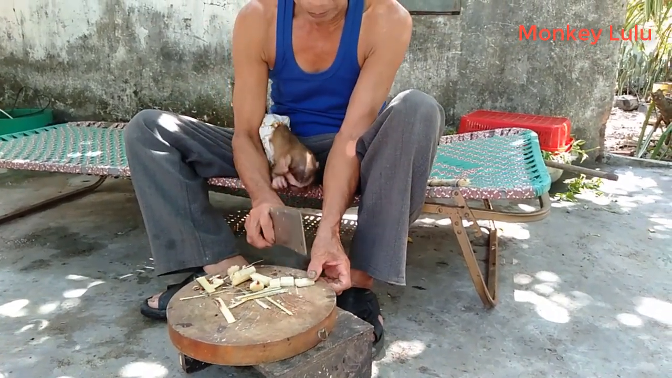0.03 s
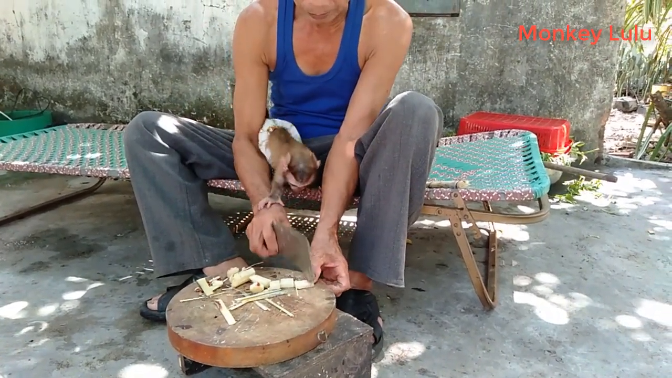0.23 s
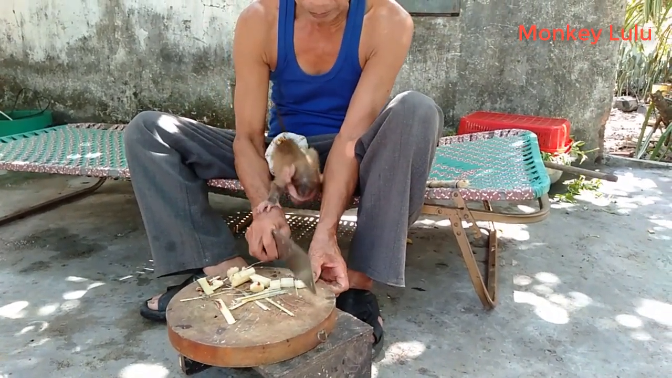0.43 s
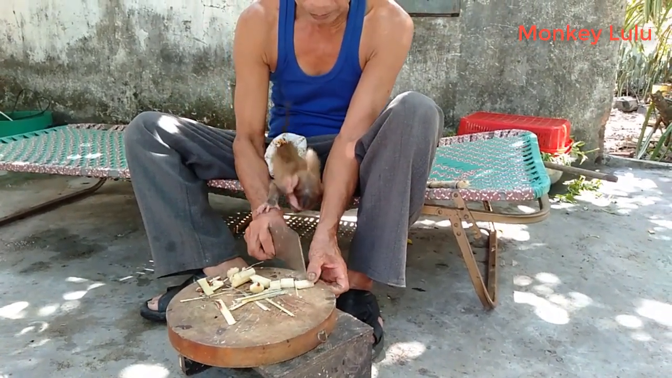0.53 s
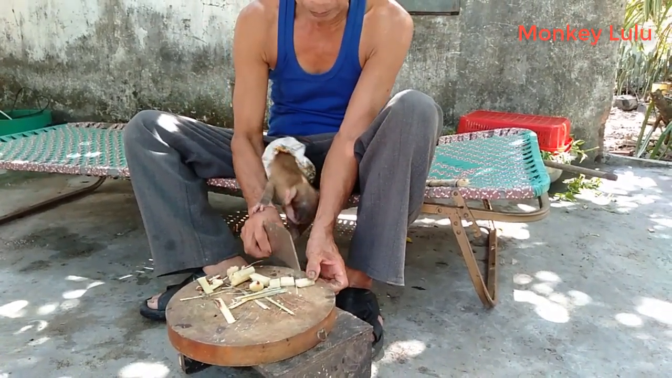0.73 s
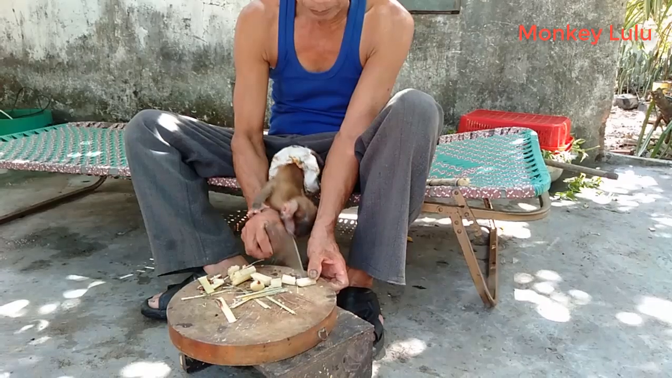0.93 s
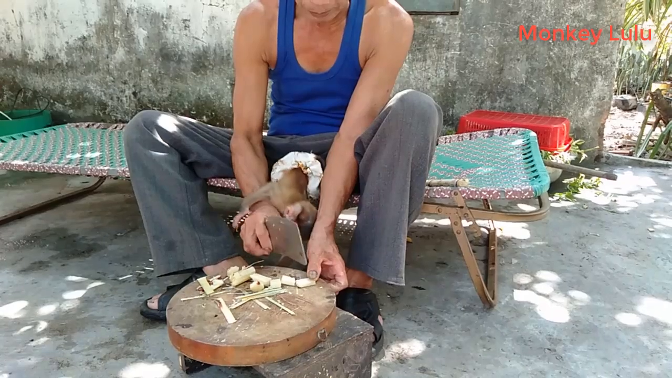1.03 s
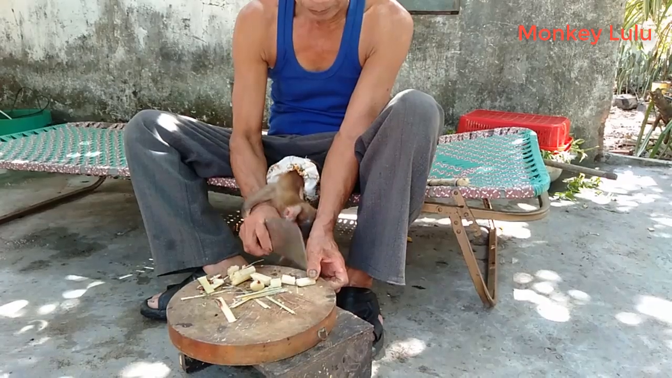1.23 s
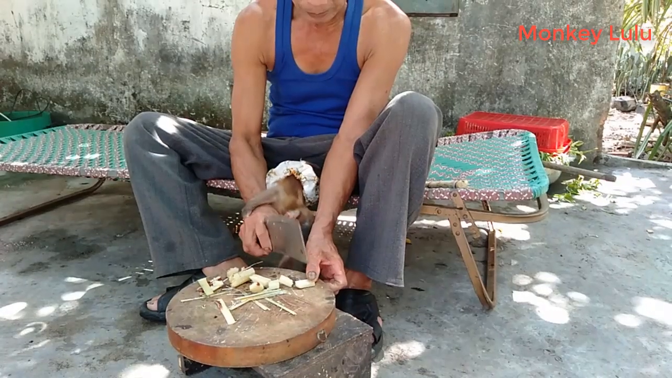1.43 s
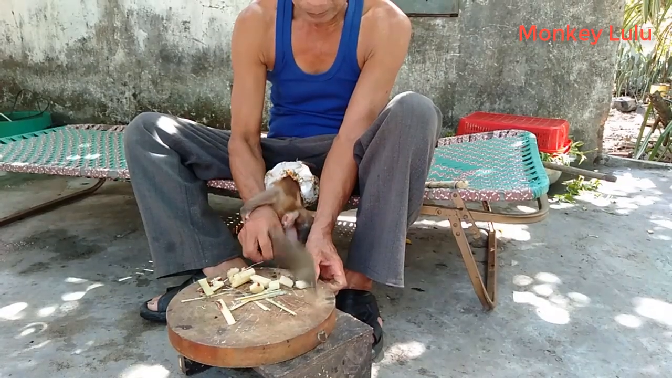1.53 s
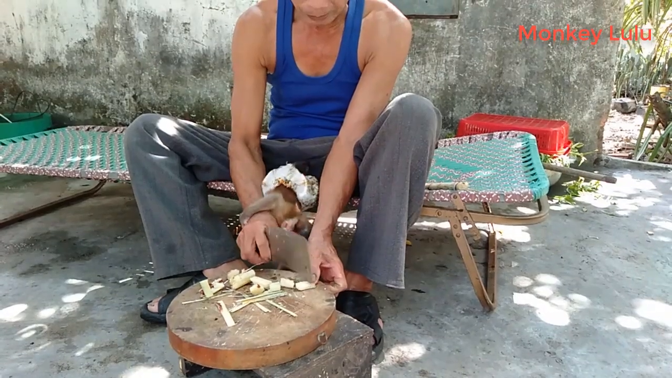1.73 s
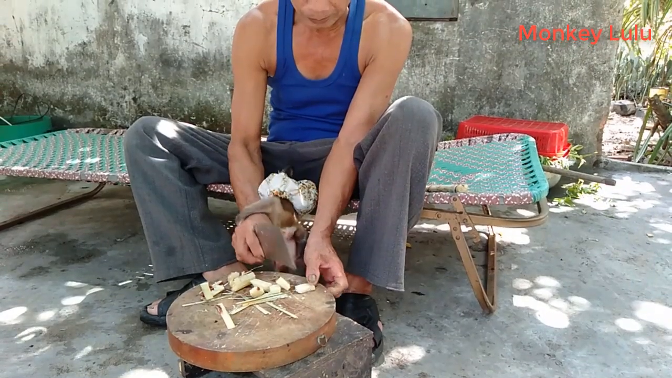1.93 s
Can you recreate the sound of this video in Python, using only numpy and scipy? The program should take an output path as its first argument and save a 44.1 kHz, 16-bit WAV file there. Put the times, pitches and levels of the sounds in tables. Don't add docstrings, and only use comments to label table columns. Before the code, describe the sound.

Hard woody chops on a block, light ticks and tumbling cane bits between, over faint insect buzz

```python
import sys
import numpy as np
from scipy import signal
from scipy.fft import rfft, irfft, next_fast_len
from scipy.io import wavfile
from scipy.ndimage import map_coordinates

SR = 44100
rng = np.random.default_rng(int(sys.argv[2]) if len(sys.argv) > 2 else 0)


def bounce(signal):
    frames = np.transpose(np.atleast_2d(signal))
    limited = np.clip(frames, -1, 1)
    pcm = np.round(limited * 32767).astype(np.int16)
    wavfile.write(sys.argv[1], SR, pcm)


def voltage_ratio(level):
    return 10 ** (np.asarray(level, float) / 20)


N = 85995

# frequency in Hz, width in Hz, level in dB.
MIDDLE_MODES = [(200, 14, -20.5), (470.5, 51, 13), (950, 10, 5.5), (1170, 5, -3.5), (1423, 80, 4),
                (1652, 7.8, -7.5), (2013, 29, 0), (2603, 210, -4.5), (2900, 41, -17.5), (3270, 98, -8.5),
                (3765, 110, -13), (4350, 200, -9.5), (4924, 100, -15), (759, 9.8, 1)]
RIM_MODES = [(200, 35, -18), (457, 32, 10), (930, 11.4, 4.5), (1244, 20, -12), (1308, 22, -10.5),
             (1592, 14, -4.5), (2435, 57, -11), (2930, 23, -18), (3570, 52, -19.5), (4800, 46, -21),
             (865, 24, -12)]
LATE_MODES = [(186, 12, -16), (477, 51, 10.5), (948, 46, 6), (1176, 10, -5.5), (1378, 71, 1.5),
              (1620, 32, -3.5), (2010, 17, -2), (2340, 127, -2.5), (2900, 30, -12), (3310, 110, -12),
              (3780, 110, -13), (4270, 190, -10), (4760, 100, -12.5), (758, 14, -3)]
TOUCH_MODES = [(130, 59, -18), (437, 8.1, 1.5), (940, 72, -1)]
# start in seconds, level in dB, free ringing in seconds, brightness in dB per octave,
# fibre crack in dB.
MIDDLE_CHOPS = [
    (0.2266, -30, 0.0066, 2, -15),
    (0.462, -30, 0.0064, 2.5, -14.5),
]
RIM_CHOPS = [
    (0.9236, -35, 0.00528, .1, -22.5),
]
LATE_CHOPS = [
    (1.6532, -31, 0.0067, 0.53, -19),
]
# frequency in Hz, level in dB.
FIBRE = [(300, -70.5), (1500, 13.5), (4000, 10), (8000, 13.5), (12000, -47), (15500, -1)]
SPLINTERS = [(1500, -25), (2400, 9.5), (3300, -8), (4500, -7.5), (5600, -12), (7000, -26)]
RATTLE = [(120, -10), (200, -7), (400, -1.5), (800, -2.5), (1600, 4), (3000, -6.5), (5500, -14.5),
          (9000, -38)]
THUMP = [(30, -22), (60, -1), (100, 6.5), (160, 14), (260, -33.5)]
FIZZ = [(2000, -42.5), (4500, -6), (8000, 3.5), (11000, -12), (13500, -8.5), (15400, 4), (16000, 1.5)]
# start in seconds, level in dB, t60 in seconds.
FIZZES = [(0.2287, -65, 0.28), (.4615, -73, 0.17), (0.6826, -53, 0.17), (.919, -59, 0.15),
          (1.385, -63.5, 0.25), (1.65, -58, 0.24), (1.888, -63.5, 0.17), (1.11, -75, 0.47)]
# frequency in Hz, width in Hz, level in dB.
EDGE_MODES = [(5200, 110, -3), (5820, 51, -3), (7040, 60, 1), (9100, 150, -18)]
GRAZE_MODES = [(2127, 93, 5), (2650, 120, -16), (4770, 110, -11), (6330, 230, 14), (7630, 190, 16),
               (11300, 300, -2), (15960, 240, -5)]
# start in seconds, level in dB, brightness in dB per octave,
# free ringing in seconds.
EDGE_RINGS = [(0.2277, -56, 3.5, 0.0056), (0.464, -66, 0, .006), (0.923, -68.5, 5.5, .005),
              (1.6535, -55.5, 1.5, .008)]
# start in seconds, level in dB, brightness in dB per octave, fibre crack in dB.
GRAZES = [(0.6822, -51.5, -6.5, -16), (0.6842, -54, -0.5, -4.5), (1.3848, -68, 0, 6),
          (1.3872, -69.5, 1.5, -3), (1.8925, -64, -1, -7)]
# frequency in Hz, width in Hz, level in dB.
SHORT_PIECE = [(1050, 270, 0.5), (1360, 70, -5.5), (1718, 90, 4), (1990, 180, -5), (2604, 134, 0),
               (2950, 95, -5.5), (3450, 170, -1.5), (4470, 180, -2.5), (5060, 190, -5)]
LONG_PIECE = [(1260, 390, 6), (1720, 280, -0.5), (1970, 150, -5), (2490, 180, -2.5), (3050, 230, -3),
              (3470, 280, -3.5), (4400, 250, -7), (5770, 300, -12)]
DULL_WOOD = [(105.7, 57, -4.5), (185, 97, 0.5), (426, 61, -2.5), (619, 190, -20), (950, 340, -8.5),
             (1350, 830, -5.5), (2080, 2300, -10.5), (3630, 3300, -35)]
# start in seconds, level in dB, brightness in dB per octave.
SHORT_TICKS = [(1.0625, -53.5, 0), (1.2682, -46, -2.3), (1.8677, -63, 2.5), (1.87, -70, 6.5),
               (1.8734, -68.5, -3)]
LONG_TICKS = [(1.1108, -41.5, -3), (1.1126, -53, 4)]
TOUCHES = [(0.6836, -56, -1), (0.7046, -50.5, 4)]
# start in seconds, length in seconds, level in dB, softness in Hz,
# the piece's note in Hz.
TUMBLES = [(0.686, 0.053, -68, 250, 150), (0.793, 0.036, -68, 1060, 755), (0.92, 0.0036, -50, 1470, 1060),
           (1.3862, 0.005, -60, 3500, 1100), (1.388, 0.031, -58, 1260, 216), (1.42, 0.012, -59, 346, 415),
           (1.888, 0.0059, -56.5, 594, 600), (1.912, 0.011, -55, 1090, 590)]
# start in seconds,
# peak level in dB, note in Hz, width of the note over its pitch.
LANDINGS = [(0.793, -61, 890, 0.29), (0.7965, -52, 710, 0.24), (0.8032, -53, 780, 0.17),
            (0.806, -56, 796, 0.17), (0.8075, -59, 844, 0.27), (0.8318, -66, 845, 0.27),
            (1.3937, -50.5, 1110, 0.58), (1.9058, -54, 1500, 0.22), (1.3888, -46, 900, 0.77),
            (1.3917, -46.5, 242, 0.78), (1.3945, -48, 950, 0.8), (1.399, -57, 420, 0.21),
            (1.4021, -45, 226, 0.95), (1.4081, -60, 330, 0.38), (1.4157, -58, 298, .6),
            (1.4195, -48, 910, 0.16), (1.421, -53, 423, 0.22), (1.4251, -51.5, 416, 0.29),
            (1.6709, -40, 517, 0.7), (1.893, -54.5, 810, .5), (1.8959, -49, 183, 0.49),
            (1.905, -44, 864, 0.11), (1.9072, -48.5, 460, 0.29), (1.9118, -48, 335, 1),
            (1.919, -49, 810, 0.26), (1.9237, -51.5, 460, 0.49), (1.928, -65, 504, .4)]
# middle in seconds, half length in seconds, level in dB, pitch in Hz.
SLIDES = [(.84, 0.031, -83.5, 3040), (1.22, 0.028, -76, 2900)]
# body resonance in Hz, width in Hz, clicks per second, level in dB.
CICADAS = [(7164, 920, 215, -68.5), (6940, 820, 100, -68), (7615, 310, 190, -76), (5976, 1300, 310, -73.5),
           (8100, 280, 2100, -90.5)]
# time in seconds, pitch in Hz, level in dB.
BIRD = [(0.098, 2880, -98), (.11, 2830, -83), (.135, 2720, -87), (.17, 2720, -79), (.21, 2700, -85),
        (0.24, 2710, -100)]
# frequency in Hz, level in dB per Hz.
TRAFFIC = [(15, -33), (30, -9.5), (84, -2), (180, -18.5), (400, -25), (800, -17), (1600, -27), (4500, -34)]
LEAVES = [(3000, 7), (5000, -8), (9000, -3.5), (12000, 1), (14900, 0), (15400, -31.5)]
# frequency in Hz, t60 in seconds.
YARD = [(150, 0.24), (400, 0.16), (1000, 0.16), (2800, 0.24), (7000, 0.035), (15000, 0.099)]


def unit(x):
    return x / np.sqrt(np.mean(x ** 2) + 1e-20)


def along(points, hz):
    f, v = np.transpose(points)
    return np.interp(np.log(hz + 1), np.log(f + 1), v)


def wobble(rate):
    knots = rng.standard_normal(int(N * rate / SR) + 4)
    return map_coordinates(knots, [np.arange(N) * rate / SR])


def filtered(x, response):
    m = next_fast_len(len(x) + SR // 4)
    return irfft(rfft(x, m) * response(np.fft.rfftfreq(m, 1 / SR)), m)[:len(x)]


def highpass(corner_hz):
    return lambda f: 1j * f / (corner_hz + 1j * f)


def peaks(modes):
    def response(f):
        total = 0
        for k, (hz, width, db) in enumerate(modes):
            total = total + (-1) ** k * voltage_ratio(db) * 1j * f * width / (hz * hz - f * f + 1j * f * width)
        return total
    return response


def hiss(spectrum, size=N):
    noise = rng.standard_normal(size)
    return unit(filtered(noise, lambda f: voltage_ratio(along(spectrum, f)) * (f > 10)))


def burst(spectrum, rise_s, t60, grain_db):
    t = np.arange(SR // 3) / SR
    level = voltage_ratio(grain_db * wobble(400)[:len(t)] - 60 * t / t60)
    return hiss(spectrum, size=len(t)) * level * (1 - np.exp(-t / rise_s))


def ring(modes, tilt_db=0, free_s=1, swell_s=0):
    t = np.arange(SR // 8) / SR
    hz, width, db = np.transpose(modes)[:, :, None]
    spread_db, rise_s, choke_s = 0.8, 0.00049, 0.006
    level = voltage_ratio(db + tilt_db * np.log2(hz / 1000) + spread_db * rng.standard_normal(hz.shape))
    side = (-1) ** np.arange(len(modes))[:, None]
    rise = 1 - np.exp(-t / (rise_s + swell_s * (hz / 3000) ** 2))
    choke = voltage_ratio(-60 * np.maximum(t - free_s, 0) / (choke_s * (hz / 500) ** 0.5))
    decay = np.exp(-np.pi * width * t)
    return np.sum(side * level * rise * choke * decay * np.cos(2 * np.pi * hz * t), axis=0)


def add(out, s, x, away=None):
    yard_db, delay_s, far_db, far_t60 = -10.5, 0.0048, -23, 0.2
    hz, t, z = signal.stft(rng.standard_normal(SR // 2), SR, nperseg=256)
    fade = voltage_ratio(-60 * t / along(YARD, hz)[:, None]) + voltage_ratio(far_db - 60 * t / far_t60)
    tail = signal.istft(z * fade, SR, nperseg=256)[1]
    walls = np.pad(tail / np.linalg.norm(tail), (round(delay_s * SR), 0))
    wet = voltage_ratio(yard_db) * signal.fftconvolve(x if away is None else away, walls)
    wet = wet + np.pad(x, (0, len(wet) - len(x)))
    part = out[round(s * SR):][:len(wet)]
    part += wet[:len(part)]


def cicadas():
    out = np.zeros(N)
    jitter, click_db, smear, octave_db, sway_db = 0.12, 3, 0.69, -27.5, 0.7
    for hz, width, rate, db in CICADAS:
        gaps, sizes = rng.standard_normal((2, 700))
        at = (np.cumsum(1 + jitter * gaps) / rate * SR).astype(int)
        clicks = np.bincount(at[at < N], voltage_ratio(click_db * sizes[at < N]), N)
        drive = (1 - smear) * unit(clicks) + smear * rng.standard_normal(N)
        body = peaks([(hz, width, 0)])
        octave = peaks([(2.1 * hz, width, octave_db / 2)])
        buzz = filtered(drive, lambda f: body(f) ** 2 + octave(f) ** 2 * (f < 15250))
        out += voltage_ratio(db + sway_db * wobble(3.8) + 0.5 * wobble(25)) * unit(buzz)
    return out


def air():
    traffic = voltage_ratio(-72.5 + 0.55 * wobble(15)) * hiss(TRAFFIC + [(9000, -97)])
    leaves = voltage_ratio(-84.5 + 1.8 * wobble(6.0)) * hiss([(1500, -25.5)] + LEAVES)
    return traffic + leaves


def bird():
    s, hz, db = np.transpose(BIRD)
    t = np.arange(N) / SR
    level = np.interp(t, s, db, left=-140, right=-140) + 3 * wobble(70)
    pitch = np.interp(t, s, hz) + 22 * wobble(140)
    return voltage_ratio(level) * np.sin(2 * np.pi * np.cumsum(pitch) / SR)


def crack():
    t = np.arange(SR // 8) / SR
    return hiss(FIBRE, size=len(t)) * voltage_ratio(-60 * t / 0.0098 / 3)


def chops():
    out = np.zeros(N)
    lead_s = 0.0013
    wall_s, wall_db = 0.0165, -19
    away_s, away_db = 0.0033, 7
    blows = zip((MIDDLE_MODES, RIM_MODES, LATE_MODES), (MIDDLE_CHOPS, RIM_CHOPS, LATE_CHOPS),
                (-12, -23, -20),
                (2.2, -1.1, 0.5))
    for modes, rows, tear_db, loose_db in blows:
        for s, db, free_s, tilt_db, crack_db in rows:
            body = ring(modes, tilt_db, free_s, swell_s=0.00056)
            knock = np.roll(body, round(lead_s * SR)) + voltage_ratio(crack_db) * crack()
            echo = voltage_ratio(wall_db) * np.roll(knock, round(wall_s * SR))
            away = voltage_ratio(db + away_db) * body * np.exp(-np.arange(len(body)) / SR / away_s)
            add(out, s - lead_s, voltage_ratio(db) * (knock + echo), filtered(away, highpass(414)))
            rattle = burst(RATTLE, rise_s=0.011, t60=0.26, grain_db=-1.5)
            add(out, s, voltage_ratio(db - 19.5 + loose_db) * rattle)
            add(out, s, voltage_ratio(db + tear_db) * burst(SPLINTERS, rise_s=0.0022, t60=0.05, grain_db=4.5))
    return out


def thumps():
    out = np.zeros(N)
    for rows in (MIDDLE_CHOPS, RIM_CHOPS, LATE_CHOPS):
        for s, db, *_ in rows:
            add(out, s, voltage_ratio(db - 24) * burst(THUMP, rise_s=0.0013, t60=0.2, grain_db=-4.0))
    return out


def edge_rings():
    out = np.zeros(N)
    for s, db, tilt_db, free_s in EDGE_RINGS:
        add(out, s, voltage_ratio(db) * ring(EDGE_MODES, tilt_db, free_s))
    return out


def fizzes():
    out = np.zeros(N)
    for s, db, t60 in FIZZES:
        add(out, s, voltage_ratio(db) * burst(FIZZ, rise_s=0.0012, t60=t60, grain_db=-2.0))
    return out


def grazes():
    out = np.zeros(N)
    for s, db, tilt_db, crack_db in GRAZES:
        add(out, s, voltage_ratio(db) * (ring(GRAZE_MODES, tilt_db) + voltage_ratio(crack_db) * crack()))
    return out


def cleaver():
    above = chops() + edge_rings() + fizzes() + grazes()
    return thumps() + filtered(above, lambda f: highpass(150)(f) ** 2)


def touches():
    out = np.zeros(N)
    for s, db, tilt_db in TOUCHES:
        touch = voltage_ratio(db) * ring(TOUCH_MODES, tilt_db, free_s=0.0109)
        add(out, s, touch, touch * np.exp(-np.arange(len(touch)) / SR / 0.0082))
    return out


def tumbles():
    out = np.zeros(N)
    bumps_per_s, bump_db = 900, -2.5
    for s, length, db, soft_hz, hz in TUMBLES:
        when, size, side = rng.random((3, 80))
        at = np.cumsum(-np.log(when)) / bumps_per_s
        at -= at[0]
        inside = at < length
        strength = voltage_ratio(bump_db * 2 * size) * np.sign(side - 0.5)
        bumps = np.zeros(SR // 8)
        np.add.at(bumps, (at[inside] * SR).astype(int), strength[inside])
        note = peaks([(hz, 0.61 * hz, -7.5)])
        thud = filtered(bumps, lambda f: (peaks(DULL_WOOD)(f) + note(f)) / (1 + 1j * f / soft_hz) ** 2)
        add(out, s, voltage_ratio(db) * thud / np.sqrt(np.sum(thud ** 2) / (length * SR)))
    return out


def landings():
    out = np.zeros(N)
    push = np.eye(1, SR // 8)[0]
    body_db, softness = -6, 1.6
    for s, db, hz, width in LANDINGS:
        note = peaks([(hz, width * hz, 0)])
        soft = lambda f: 1 / (1 + 1j * f / (softness * hz)) ** 2
        thud = filtered(push, lambda f: (note(f) + voltage_ratio(body_db) * peaks(DULL_WOOD)(f)) * soft(f))
        add(out, s, voltage_ratio(db) * thud / np.abs(thud).max())
    return out


def slides():
    out, t = np.zeros(N), np.arange(N) / SR
    for s, half, db, hz in SLIDES:
        grain = rng.standard_normal(N) * voltage_ratio(2.1 * wobble(150))
        rub = filtered(grain, lambda f: peaks([(hz, 0.3 * hz, 0)])(f) ** 2)
        out += voltage_ratio(db) * unit(rub) * np.exp(-((t - s) / half) ** 2)
    return out


def ticks():
    out = np.zeros(N)
    for modes, rows in ((SHORT_PIECE, SHORT_TICKS), (LONG_PIECE, LONG_TICKS)):
        for s, db, tilt_db in rows:
            tick = voltage_ratio(db) * ring(modes, tilt_db)
            add(out, s, tick, 1.2 * tick * np.exp(-np.arange(len(tick)) / SR / 0.0045))
    return out


def scene():
    pieces = touches() + tumbles() + landings() + slides() + ticks()
    return (cicadas() + air() + bird() + cleaver() + pieces)[None]


def top_cut(x):
    return signal.sosfilt(signal.butter(12, 16390, fs=SR, output="sos"), x)


def record(dry):
    mix = filtered(dry[0], lambda f: 1 / (1 + (f / 15850) ** 80))[None]
    return top_cut(mix)


dry = scene()
out = record(dry)
bounce(out)
```